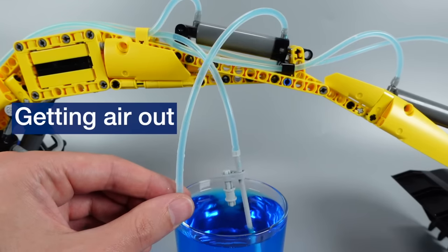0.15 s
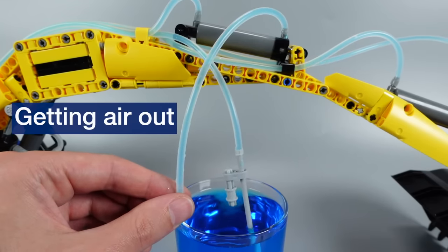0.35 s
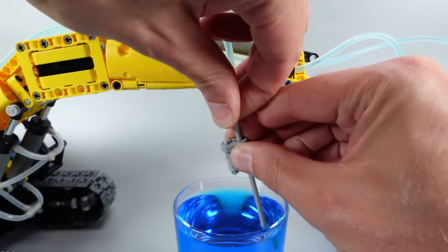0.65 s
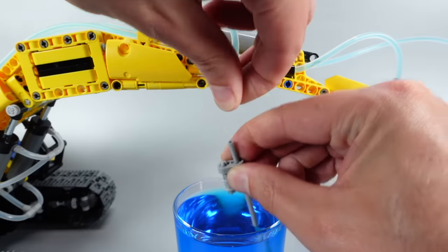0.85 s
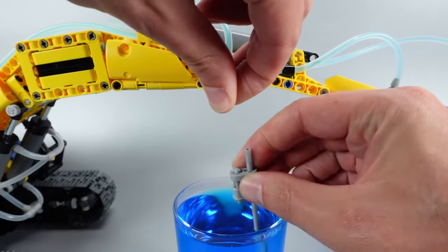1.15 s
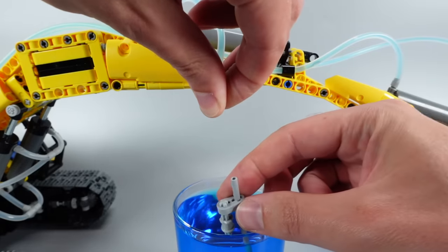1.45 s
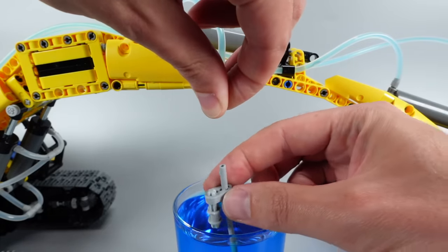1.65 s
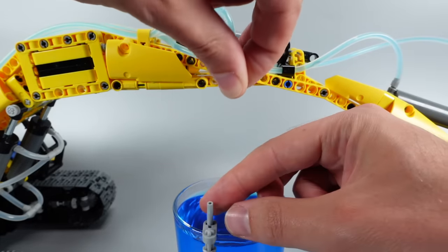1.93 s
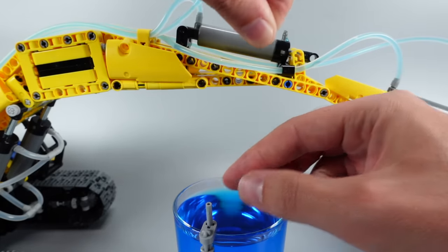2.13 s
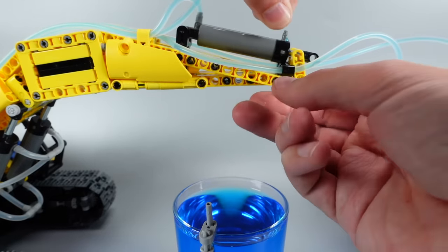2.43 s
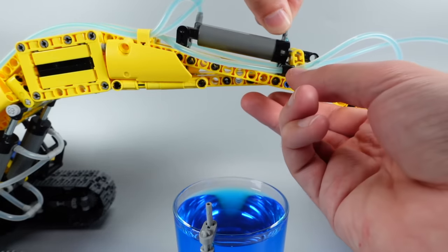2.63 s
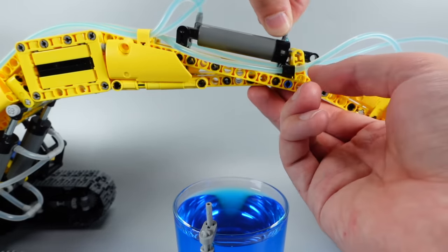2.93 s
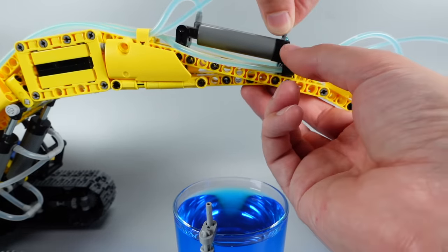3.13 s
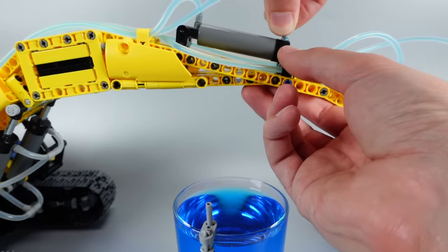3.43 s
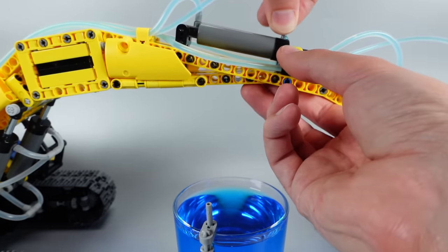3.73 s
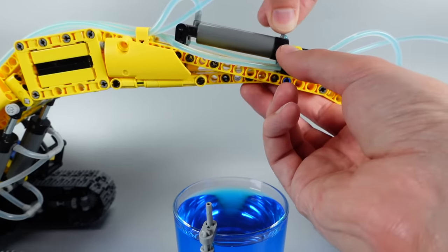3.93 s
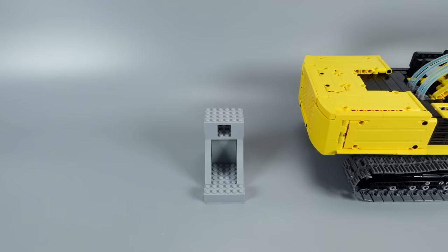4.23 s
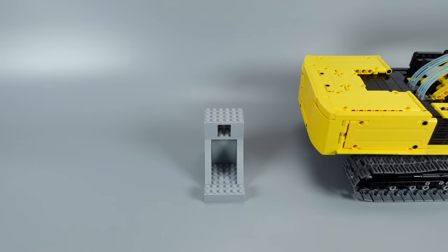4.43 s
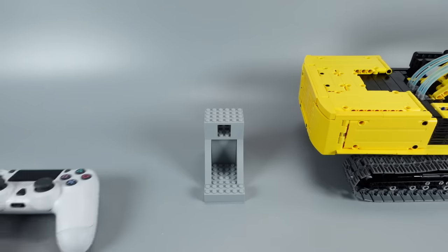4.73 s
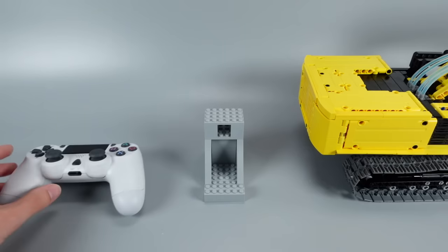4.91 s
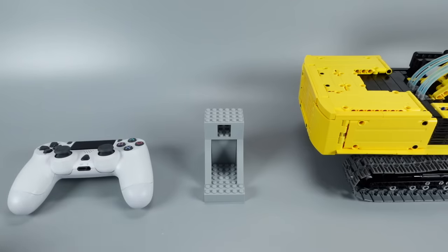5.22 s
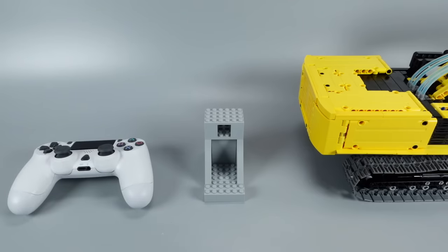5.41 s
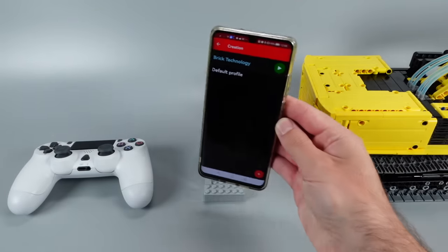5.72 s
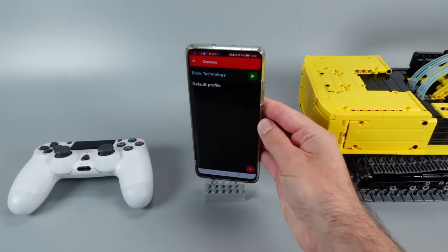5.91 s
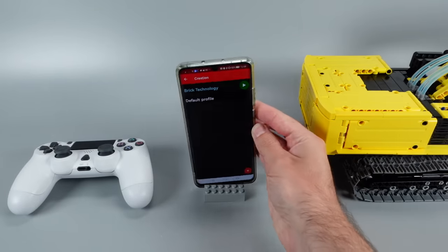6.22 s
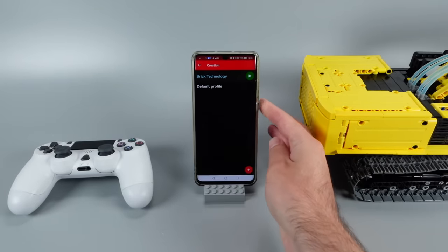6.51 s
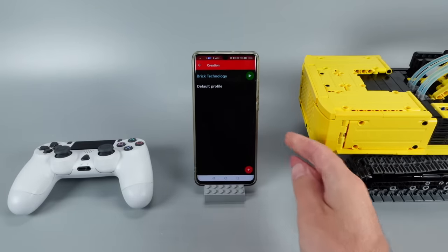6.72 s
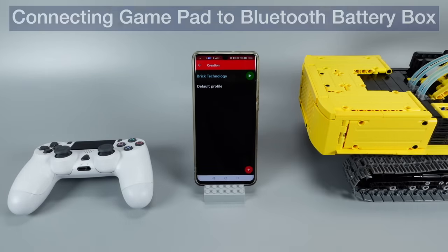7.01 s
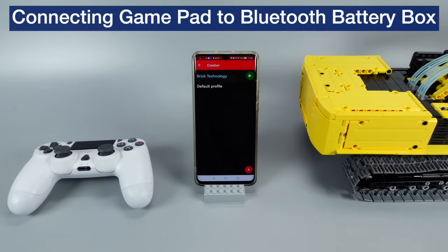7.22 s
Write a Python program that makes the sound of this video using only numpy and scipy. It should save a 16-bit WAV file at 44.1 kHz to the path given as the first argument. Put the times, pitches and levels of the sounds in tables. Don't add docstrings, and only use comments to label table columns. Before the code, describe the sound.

A small motor hums at a workbench and cuts off; plastic ticks and glass clinks follow, then a scraping pad, phone knocks and a button click.

```python
import sys
import numpy as np
from scipy import signal
from scipy.fft import rfft, irfft
from scipy.io import wavfile

SR = 44100
rng = np.random.default_rng(int(sys.argv[2]) if len(sys.argv) > 2 else 0)


def inscribe(sig):
    pcm = np.round(np.clip(np.atleast_2d(sig).T, -1, 1) * 32767)
    wavfile.write(sys.argv[1], SR, pcm.astype(np.int16))


def to_linear_factor(level_db):
    exponent = np.asarray(level_db, float) / 20
    return 10 ** exponent


N = 324576
HZ = np.maximum(np.fft.rfftfreq(N, 1 / SR), 1)

# multiple of gear speed, level in dB, wander in
# Hz.
WHINE_LINES = [(3, -17, 6), (4, -20, 14), (4.96, -21, 10), (7, -17, 9), (7.54, -16, 14), (8.03, -16, 22),
               (8.45, -9, 10), (8.6, -16, 14), (11.1, -18, 20), (16.7, -20, 25), (22.47, -15, 20),
               (24.73, -14, 25), (25.02, -10, 16), (31, -20, 30), (33.72, -17, 20), (33.9, -15, 16),
               (38.7, -23, 30)]
# frequency in Hz, density in dB per Hz.
GEAR_SPECTRUM = [(180, -37), (300, -12.5), (404, -17), (685, -10), (756, -13), (1460, -12), (1910, -2),
                 (2280, -12), (4490, -11.5), (5660, -1.5), (6250, -7.5), (7880, -7.5), (10300, -19),
                 (12700, -18.5), (15500, -39.5)]
# pitch in Hz, level in dB, t60 in seconds, family.
GLASS_MODES = [(1744, 0, .55, 1), (1750, -3, .5, 1), (3704, 0, .27, 2), (3711, -15, .25, 2),
               (6352, -12, .16, 3), (6557, 0, .22, 3), (8360, 0, .12, 0), (8823, -5, .14, 0),
               (10290, 0, .16, 4), (10900, -4, .1, 4), (14700, -11, .05, 4)]
# start in seconds, strength in dB, favoured pitch in Hz, deepest ring in dB.
CLINKS = [
    (1.2149, -87, 5100, -78),
    (1.247, -61.5, 4600, -68),
    (1.4553, -73, 6800, -70.5),
    (1.595, -49, 7400, -66.5),
    (1.7652, -49, 4870, -72),
    (1.8585, -56.5, 5700, -75),
    (1.916, -47.5, 9300, -75),
    (1.9343, -45, 6140, -56.5),
    (1.9500, -34, 5270, -63.5),
    (1.9680, -66.5, 5000, -52.5),
]
# pitch in Hz, level in dB, t60
# in seconds.
BENCH_MODES = [(140, -7, .45), (165, -8, .3), (188, -3, .3), (226, -1, .35), (264, -5, .26), (323, -6, .24),
               (377, -12, .24), (441, -18, .2), (484, -22, .25), (560, -25, .25),
               (68, -38, .9), (92, -31, .8)]
# start in seconds, bench level in dB, rap level in dB.
TUBE_TOUCHES = [
    (0.9, -53, -82),
    (0.944, -43.5, -71.5),
    (0.988, -48.5, -72),
    (1.015, -68, -72),
    (1.029, -58, -75.5),
    (1.059, -60, -82),
]
# start in seconds, bench level in dB, edge level in dB.
VALVE_TICKS = [(0.826, -53.5, -61), (1.246, -66, -64), (1.458, -58.5, -65), (1.595, -52.5, -55),
               (1.767, -52.5, -53.5), (1.858, -49.5, -58.5), (1.914, -49.5, -75), (1.934, -42, -51.5),
               (1.951, -34.5, -47), (1.965, -44.5, -50), (4.057, -59, -58), (5.656, -82, -67.5)]
# start in seconds, bench level in dB, rap level in dB.
CYLINDER_CREAKS = [(3.376, -56, -66.5), (3.387, -49, -88), (3.439, -48.5, -70), (3.584, -49.5, -75),
                   (3.692, -70, -70.5), (3.845, -53, -67), (3.875, -47, -75), (3.928, -56, -69),
                   (3.957, -47, -79), (4.002, -47.5, -75), (4.012, -50, -65.5), (4.065, -49, -67),
                   (4.095, -58, -55.5), (4.107, -46.5, -75), (4.127, -57, -63), (4.14, -49, -83),
                   (4.232, -53, -64.5)]
# shell pitch in Hz, shell level in dB, shell lean from the bench column
# to the third column (0 bench, 1 third column, negative leans away), rap level and crack level in dB over the
PART_VOICES = [
    (480, -10, -0.1, 6, -15),
    (635, -12, -0.25, -6, 2),
    (577, -3.5, .7, 1, -7),
]
# time in seconds, body resonance in Hz, speed as grit in dB, weight in dB.
SLIDE_PATH = [
    (4.24, 220, -94.5, -20),
    (4.32, 224.7, -64, -0.5),
    (4.43, 232.9, -52, -7),
    (4.6, 193.6, -47.5, -3),
    (4.77, 204.6, -50, 7.5),
    (4.89, 191.7, -52.5, -0.5),
    (4.99, 174.8, -65, 7),
    (5.1, 155.7, -104.5, 5),
    (5.25, 154, -125, 1.5),
]
# frequency in Hz, density in dB per Hz.
SCRAPE_SPECTRUM = [(180, -14), (300, 0), (337, 2.5), (372, -2), (453, 1), (500, -16.5), (571, -1.5),
                   (849, -11), (937, -12.5), (3130, -24), (15500, -48)]
# time of the peak in seconds, level in dB, length in ms.
SLIPS = [(4.31, -41.5, 47), (4.438, -18, 62), (4.485, -19, 66), (4.535, -19, 29), (4.555, -17.5, 13.2),
         (4.59, -18.5, 53), (4.625, -17, 35), (4.644, -7, 13.2), (4.662, -12, 7.4), (4.71, -20, 28),
         (4.76, -21.5, 14), (4.782, -21.5, 14), (4.83, -23, 15), (4.848, -16, 12.7), (5.02, -26, 16.4)]
# start in seconds, bench level in dB, shell pitch in Hz, shell level in dB,
# edge level in dB.
PHONE_KNOCKS = [(6.049, -27.5, 447, -30, -45.5), (6.068, -39, 425, -37, -51.5),
                (6.073, -22.5, 442, -23.5, -56.5), (6.091, -17.5, 480, -59, -79),
                (6.125, -27, 400, -40.5, -57), (6.169, -27.5, 428, -21.5, -36),
                (6.189, -29, 454, -44, -51.5), (6.347, -40.5, 420, -51, -67),
                (6.365, -54.5, 422, -61.5, -64.5), (6.372, -53.5, 428, -65.5, -66),
                (6.393, -43, 406, -54.5, -67.5), (6.439, -49.5, 420, -67.5, -70.5),
                (6.566, -6, 360, -15.5, -36.5), (6.583, -14.5, 391, -21.5, -62),
                (6.654, -36, 352, -37.5, -66), (6.697, -38, 412, -43.5, -77),
                (6.736, -41.5, 383, -48, -77.5)]
# start in seconds, level in dB, ring in Hz, t60 in seconds.
BUTTON_SNAPS = [
    (7.3404, -36, 1800, .008),
    (7.3414, -23, 1850, .011),
    (7.3436, -27, 2100, .006),
    (7.3443, -24, 5700, .006),
    (7.3446, -22, 2000, .006),
    (7.3452, -11, 2050, .007),
]
# frequency in Hz, t60 in seconds.
ROOM_T60 = [(100, 0.23), (250, 0.29), (1000, 0.4), (4000, 0.38), (12000, 0.067)]
# frequency in Hz, level in dB.
WALL_ECHO = [(100, 1.5), (1000, -5), (4000, -6.5), (14000, -9)]
# pitch in Hz, level in dB.
LAMP_WHISTLE = (5290, -103)
# frequency in Hz, density in dB per Hz.
AIR_SPECTRUM = [(20, -7.5), (40, -0.5), (75, -9.5), (98, 1), (150, -7), (250, -4), (320, -10.5), (500, -16),
                (1000, -27), (2000, -31.5), (4000, -36), (8000, -34.5), (13000, -34), (16000, -43.5)]
# frequency in Hz, left-right likeness (-1 to 1).
AIR_LIKENESS = [(60, -0.37), (180, 0.14), (550, -0.51), (1650, 0.23), (4970, 0.55), (15000, -0.63)]

TURNS_PER_S, HUNT_PER_S, PUMP_STEP = 229.0, 1.8, 6
HUM_DB, GEAR_DB = -27, -42
LET_GO_S, LET_GO_DB, RING_OUT_DB_PER_S, SAG_PER_S2 = 0.5124, -10, -150, 300
GEAR_FADE_S, GEAR_FADE_DB_PER_S, CUT_S = 0.5, -230, 0.5694
STOP_S, COAST_PER_S = 0.53, 8.8
CONTACT_DB_PER_OCTAVE = -17
PARTNER_FADE = 0.72
CRUISE_DB = -50
JUDDER_DB, JUDDER_FOLLOWS = -30, .55
SCRAPE_DB, SCRAPE_FOLLOWS, SLIP_SCRAPE_DB = -46.5, 0.59, -13.5
RAP_SHARE, RAP_DB = 0.5, -4
SEATED_S = 6.5
FITTING_TILT_DB, SEATED_TILT_DB, HAND_TILT_DB = -11.5, 2.5, -1
STAND_HZ, STAND_DB, STAND_T60_S = 1750, -4, 0.054
PRESS_S, PRESS_DB, PRESS_HZ = 7.329, -46.5, 93.5
AIR_DB, QUIET_AIR_DB, NEW_SETUP_S = -63, -63.5, 4.6


def motor():
    t = np.arange(N) / SR
    free = np.clip(t - LET_GO_S, 0, .1)
    speed = TURNS_PER_S + HUNT_PER_S * drift(7.2) - SAG_PER_S2 * free
    hum_db = HUM_DB + np.clip(-900 * free, LET_GO_DB, 0) + RING_OUT_DB_PER_S * free
    gear_db = GEAR_DB + GEAR_FADE_DB_PER_S * np.clip(t - GEAR_FADE_S, 0, 1)
    gate = np.clip((CUT_S - t) / 0.0038, 0, 1)
    turn = 2 * np.pi * np.cumsum(speed) / SR
    pump = turn / PUMP_STEP

    hum = np.sin(turn) * to_linear_factor(0.85 * drift(7.3))
    hum += to_linear_factor(-20.5) * np.sin(turn - pump) + to_linear_factor(-35.0) * np.sin(turn + pump)
    hum += to_linear_factor(-37) * narrow(0.63 * turn, wander_hz=40)
    hum = np.sqrt(2) * to_linear_factor(hum_db) * hum * gate

    coasting = np.exp(-COAST_PER_S * np.clip(t - STOP_S, 0, 1))
    gears = 2 * np.pi * np.cumsum(229.2 * coasting) / SR
    whine = 0
    for multiple, db, wander_hz in WHINE_LINES:
        whine = whine + to_linear_factor(db) * coasting ** (multiple / 19.0) * narrow(multiple * gears, wander_hz)
    beat = to_linear_factor(2.0 * np.sin(pump) + 0.64 * drift(25))
    rattle = np.array([colour(rng.standard_normal(N), GEAR_SPECTRUM) for side in "mlr"]) * beat
    direct = to_linear_factor(-0.5) * (whine + rattle[0]) * to_linear_factor(gear_db) * gate
    diffuse = to_linear_factor(1) * rattle[1:] * to_linear_factor(gear_db) * gate
    body = irfft(rfft(direct) / (1 + (HZ / 3200) ** 4), N)
    beamed = place(body, 10.0, 1.2) + place(direct - body, 3.0, 1.2)
    return place(hum, -2.8, 0.27) + beamed + diffuse


def glass():
    s, db, favoured_hz, deep_db = np.transpose(CLINKS)
    luck_db = rng.normal(0, 1, (len(s), len(GLASS_MODES)))
    out = 0
    for k, (hz, mode_db, t60, family) in enumerate(GLASS_MODES):
        if family == 1:
            struck = deep_db
        else:
            struck = db + CONTACT_DB_PER_OCTAVE * abs(np.log2(hz / favoured_hz))
        if k == 1:
            struck = struck + PARTNER_FADE * (deep_db - deep_db.max())
        out = out + ring(train(s, struck + mode_db + luck_db[:, k]), hz, t60)
    return out


def slide():
    hz, grit_db, weight_db, gate = in_time(SLIDE_PATH)
    t, phase = np.arange(N) / SR, 2 * np.pi * np.cumsum(hz) / SR
    swell = 0
    for k, (s, db, ms) in enumerate(SLIPS):
        swell = swell + (-1) ** k * to_linear_factor(db) * np.exp(-((t - s) / (ms / 2000)) ** 2)
    chatter = to_linear_factor(-6.5) * narrow(phase, wander_hz=35.12)
    chatter += to_linear_factor(-14) * narrow(0.79 * phase, wander_hz=45)
    chatter += to_linear_factor(-19.5) * narrow(1.0 * phase, wander_hz=69)
    judder_db = JUDDER_DB + weight_db + JUDDER_FOLLOWS * (grit_db - CRUISE_DB)
    judder = swell * np.sin(phase + .4 * drift(12)) + chatter * to_linear_factor(judder_db) * gate

    grains = []
    for side in "mlr":
        sizes = to_linear_factor(2.4 * np.minimum(rng.exponential(1, N), 5)) * rng.choice([-1, 1], N)
        caught = rng.random(N) < 5000 * to_linear_factor(4 * drift(30)) / SR
        grains.append(colour(sizes * caught, SCRAPE_SPECTRUM))
    grains = np.array(grains)
    grains[0] += to_linear_factor(-6.5) * rms_one(ring(grains[0], 620, .025))
    low = irfft(rfft(grains) / (1 + (HZ / 1800) ** 2), N)
    scrape = to_linear_factor(SCRAPE_DB + weight_db + SCRAPE_FOLLOWS * (grit_db - CRUISE_DB))
    scrape = scrape + to_linear_factor(SLIP_SCRAPE_DB) * swell ** 2
    hiss = to_linear_factor(grit_db - 1.0) * (1 + 2.5 * abs(swell))
    rub = (rms_one(low) * scrape + rms_one(grains - low) * hiss) * gate
    stereo = place(judder, 0.0, .8) + place(rub[0], 1.0, .9) + to_linear_factor(-2) * rub[1:]
    return stereo, judder + rub[0]


def phone_rows():
    s, bench_db, hz, shell_db, edge_db = np.transpose(PHONE_KNOCKS)
    rap_db = RAP_DB + RAP_SHARE * (shell_db + edge_db)
    return np.transpose([s, bench_db, hz, shell_db, rap_db, edge_db])


def stand():
    rows = phone_rows()
    rows = rows[rows[:, 0] < SEATED_S]
    return ring(train(rows[:, 0], rows[:, 4] + STAND_DB), STAND_HZ, STAND_T60_S)


def hand_rows():
    rows = []
    for table, voice in zip((TUBE_TOUCHES, VALVE_TICKS, CYLINDER_CREAKS), PART_VOICES):
        hz, shell_db, lean, rap_db, crack_db = voice
        for s, bench_db, db in table:
            shell = bench_db + shell_db + lean * (db - bench_db)
            rows.append((s, bench_db, hz * rng.uniform(0.724, 1.2), shell, db + rap_db, db + crack_db))
    return rows


def knocks(table, shell_t60, rap_t60, crack_t60, rap_hz, top_hz, tilt_db):
    rows = np.array(table)
    shell = np.zeros(N)
    for s, _, hz, db, _, _ in rows:
        at = int(s * SR)
        push = soft(train([0], db + 10)[:SR // 8], cut_hz=1500)
        overtone = ring(push, 2.09 * hz, .5 * shell_t60)
        shell[at:at + SR // 8] += ring(push, hz, shell_t60) - to_linear_factor(-12.5) * overtone
    rap = crack(rows[:, 0], rows[:, 4] + 20, rap_t60, low_hz=800, high_hz=rap_hz)
    rap = soft(rap, cut_hz=2400)
    snap = crack(rows[:, 0], rows[:, 5] + 5, crack_t60, low_hz=rap_hz, high_hz=top_hz)
    return shell + rap + snap, bench(rows[:, 0], rows[:, 1], tilt_db)


def bench(times, db, tilt_db):
    modes = BENCH_MODES
    luck = rng.normal(0, 1, (len(times), len(modes), 2))
    out = np.zeros((2, N))
    for k, (hz, level_db, t60) in enumerate(modes):
        struck_db = db + level_db + tilt_db * np.log2(hz / 200) - 7.0 + np.sqrt(6) * luck[:, k, 0]
        rung = ring(soft(train(times, struck_db), cut_hz=425), hz, 0.7 * t60)
        out += (-1) ** (k // 2) * place(rung, 1.5 + 2 * luck[0, k, 1], .25 + .22 * luck[1, k, 1])
    return out


def crack(times, db, t60, low_hz, high_hz=15500):
    fall = signal.lfilter([1], [1, -to_linear_factor(-60 / (t60 * SR))], train(times, db) + 1e-18)
    return band(fall * rng.standard_normal(N), low_hz, high_hz)


def button():
    s, snap_db, _, _ = np.transpose(BUTTON_SNAPS)
    out = sum(ring(train([start], db), hz, t60) for start, db, hz, t60 in BUTTON_SNAPS)
    out = band(band(out, 1070, 5400), 1050, 5100)
    out = out + ring(soft(train([PRESS_S], PRESS_DB), cut_hz=300), PRESS_HZ, .08)
    return out + crack(s, snap_db - 24, t60=.006, low_hz=2500, high_hz=8000)


def room(x):
    t, tail = np.arange(SR // 2) / SR, 0
    white = rng.standard_normal((2, 2, SR // 2))
    for k, low in enumerate(60 * 2 ** np.arange(0, 8, 1 / 3)):
        fading = to_linear_factor(at_hz(WALL_ECHO, low) - 60 * t / at_hz(ROOM_T60, low))
        tail = tail + band(white[k % 2], low, low * 2 ** (1 / 3)) * fading
    tail = tail * np.clip(t / 0.002, 0, 1) / np.sqrt(np.sum(tail ** 2) / 2)
    return signal.fftconvolve(x[None], tail, axes=1)[:, :N]


def lamp():
    t = np.arange(N) / SR
    hz, db = LAMP_WHISTLE
    return to_linear_factor(db) * narrow(2 * np.pi * hz * t, wander_hz=15) * (t < 4.2)


def air():
    level_db = np.where(np.arange(N) / SR < NEW_SETUP_S, AIR_DB, QUIET_AIR_DB)
    alike = np.clip(at_hz(AIR_LIKENESS, HZ), -1, 1)
    mid, side = rfft(rng.standard_normal((2, N))) * to_linear_factor(at_hz(AIR_SPECTRUM, HZ))
    both = np.sqrt(1 + alike) * mid + np.sqrt(1 - alike) * side * [[1], [-1]]
    rumbling = 1 / (1 + (HZ / 900) ** 2)
    rumble = irfft(both * rumbling, N) * to_linear_factor(level_db + 2.2 * drift(18))
    hiss = irfft(both * (1 - rumbling), N) * to_linear_factor(-70.0)
    return (rumble + hiss) / np.sqrt(np.mean(irfft(both, N) ** 2))


def rms_one(x):
    return x / np.sqrt(np.mean(x ** 2) + 1e-20)


def in_time(rows):
    s, *columns = np.transpose(rows)
    t = np.arange(N) / SR
    gate = np.interp(t, [s[0] - .004, s[0], s[-1], s[-1] + .004], [0, 1, 1, 0])
    return [np.interp(t, s, c) for c in columns] + [gate]


def at_hz(points, hz):
    point_hz, value = np.transpose(points)
    return np.interp(np.log(hz), np.log(point_hz), value)


def colour(x, points):
    return rms_one(irfft(rfft(x) * to_linear_factor(at_hz(points, HZ)), N))


def drift(rate_hz):
    return rms_one(irfft(rfft(rng.standard_normal(N)) / (1 + (HZ / rate_hz) ** 4), N))


def narrow(phase, wander_hz):
    return drift(wander_hz) * np.cos(phase) + drift(wander_hz) * np.sin(phase)


def band(x, low_hz, high_hz):
    sos = signal.butter(2, [low_hz, min(high_hz, .45 * SR)], "band", fs=SR, output="sos")
    return signal.sosfilt(sos, x)


def ring(clicks, hz, t60):
    r, w = to_linear_factor(-60 / (t60 * SR)), 2 * np.pi * hz / SR
    return signal.lfilter([0, np.sin(w)], [1, -2 * r * np.cos(w), r * r], clicks + 1e-18)


def soft(clicks, cut_hz):
    r = np.exp(-2 * np.pi * cut_hz / SR)
    return signal.lfilter([(1 - r) ** 2], [1, -2 * r, r * r], clicks)


def train(times, db):
    clicks = np.zeros(N)
    clicks[(np.asarray(times) * SR).astype(int)] = to_linear_factor(db)
    return clicks


def place(x, pan_db, lead_ms):
    lag = int(round(lead_ms * SR / 1000))
    late = np.concatenate([np.zeros(abs(lag)), x])[:N]
    left, right = (x, late) if lag > 0 else (late, x)
    return np.array([to_linear_factor(pan_db / 2) * left, to_linear_factor(-pan_db / 2) * right])


def scene():
    clinks, click = glass(), button()
    pad, pad_send = slide()
    phone_tilt_db = np.where(np.array(PHONE_KNOCKS)[:, 0] < SEATED_S, FITTING_TILT_DB, SEATED_TILT_DB)
    phone, phone_thump = knocks(phone_rows(), shell_t60=0.019, rap_t60=0.015, crack_t60=0.027,
                                rap_hz=1885, top_hz=11200, tilt_db=phone_tilt_db)
    phone = phone + stand()
    hands, hand_thump = knocks(hand_rows(), shell_t60=0.015, rap_t60=.014, crack_t60=.012,
                               rap_hz=2560, top_hz=13000, tilt_db=HAND_TILT_DB)
    thumps = phone_thump + hand_thump
    near = place(clinks, 2.5, -.2) + place(phone, 2.5, .25) + place(hands, 0.5, -.3) + thumps
    send = to_linear_factor(-13.5) * clinks + to_linear_factor(-11.5) * phone + to_linear_factor(-9) * hands + to_linear_factor(-11) * thumps[0]
    send = send + to_linear_factor(-6) * pad_send + to_linear_factor(-22) * click
    small_things = motor() + near + pad + click + room(send)
    no_bass = signal.butter(2, 90, "high", fs=SR, output="sos")
    return signal.sosfilt(no_bass, small_things) + lamp() + air()


def low_pass(x):
    return signal.sosfilt(signal.butter(12, 15940, fs=SR, output="sos"), x)


def record(dry):
    return low_pass(dry)


dry = scene()
out = record(dry)
inscribe(out)
```